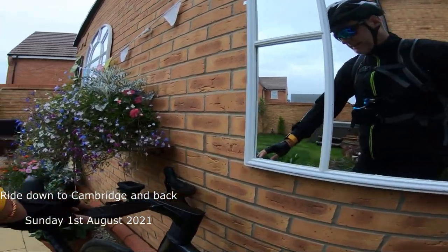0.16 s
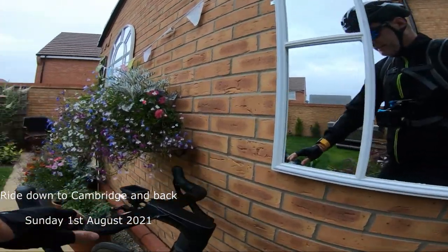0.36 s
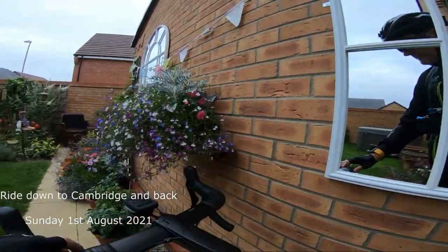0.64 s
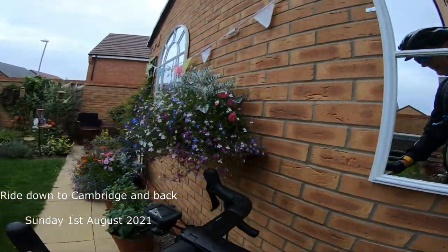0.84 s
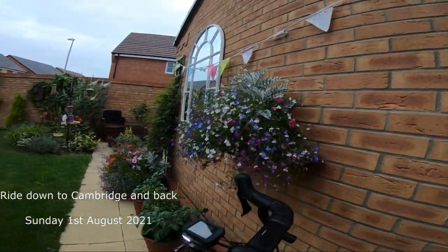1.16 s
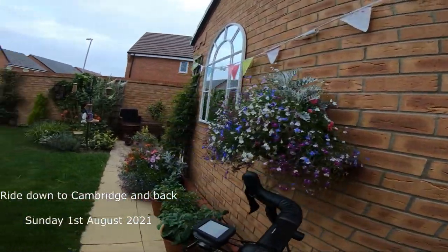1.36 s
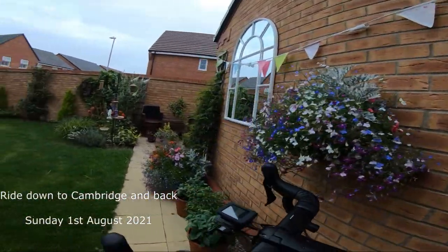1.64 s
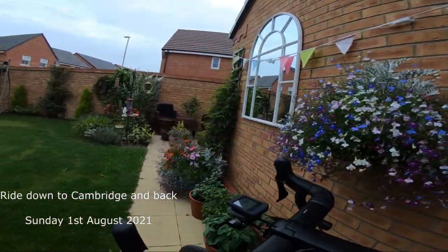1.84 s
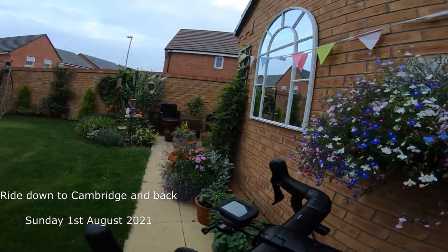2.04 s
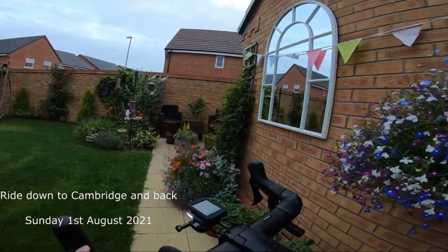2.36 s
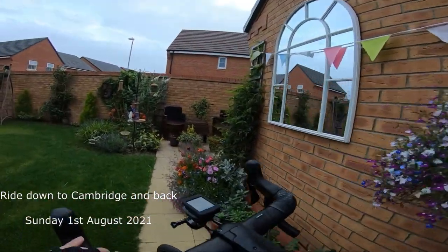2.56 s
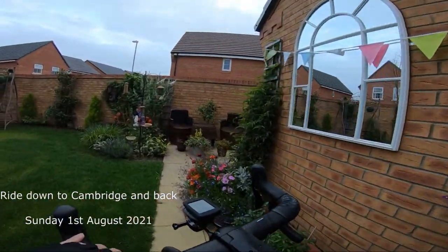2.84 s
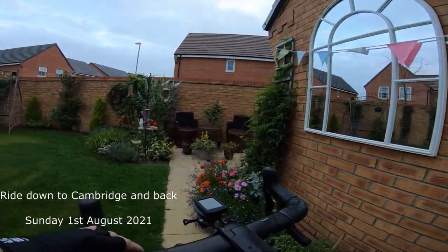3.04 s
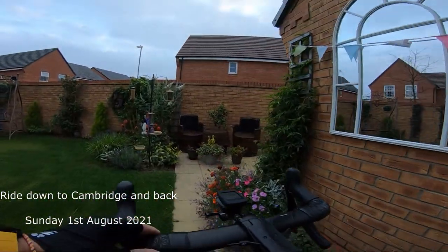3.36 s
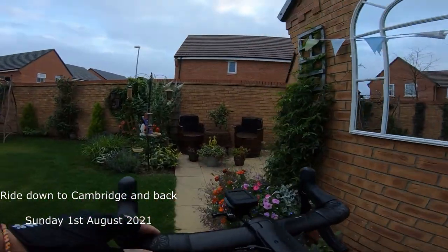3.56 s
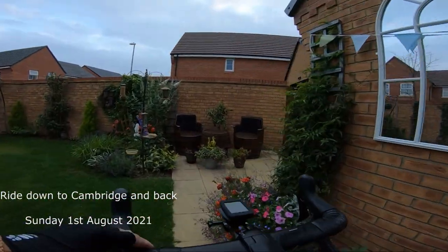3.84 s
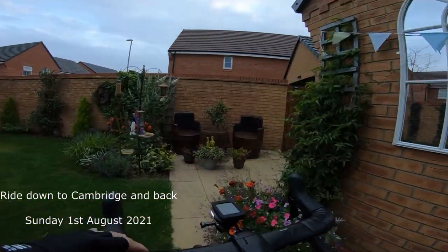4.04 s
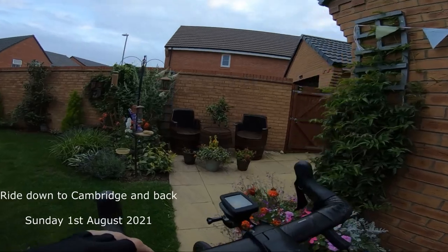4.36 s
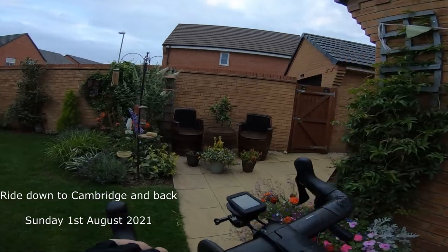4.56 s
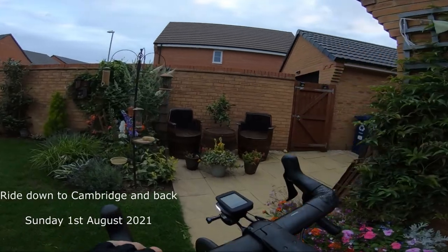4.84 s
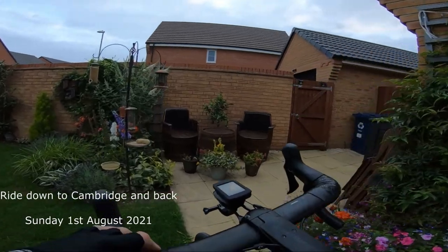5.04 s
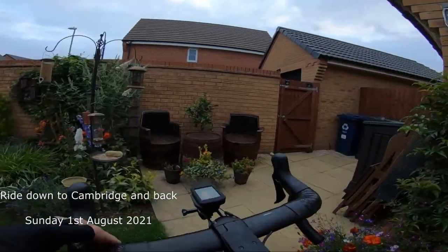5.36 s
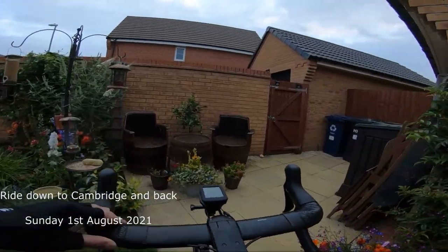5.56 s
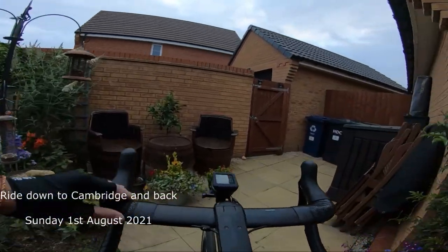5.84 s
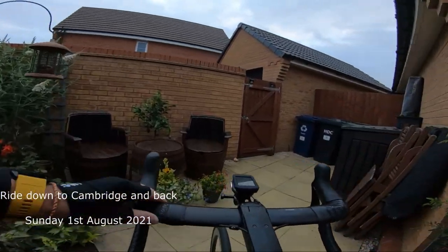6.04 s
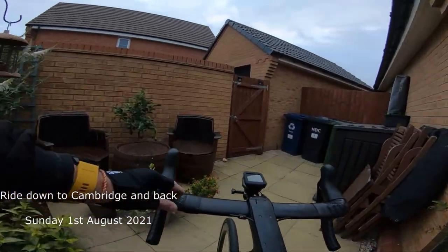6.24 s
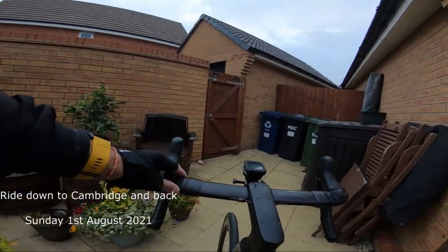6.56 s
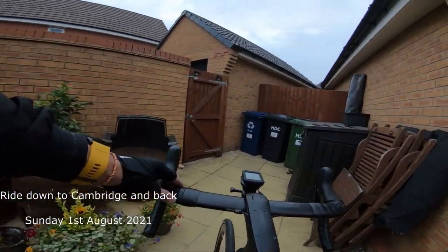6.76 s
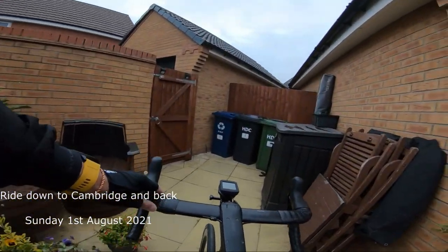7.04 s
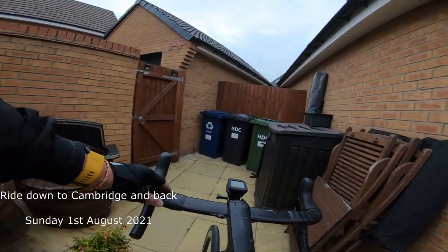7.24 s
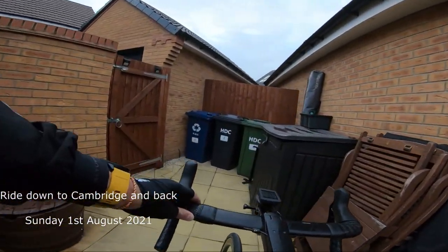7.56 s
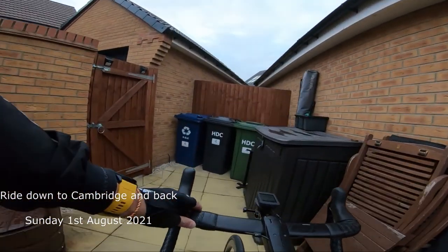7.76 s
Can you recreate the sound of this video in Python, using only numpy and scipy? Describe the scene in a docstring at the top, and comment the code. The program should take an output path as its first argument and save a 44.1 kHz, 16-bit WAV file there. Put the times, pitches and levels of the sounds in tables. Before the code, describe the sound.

A bicycle is wheeled by hand over paving in a small brick-walled yard, heard close in stereo. For the first 1.4 s there is only a quiet hiss, faint tyre grit, dull knocks, short scuffs, a small click on the right at 0.6 s and two barely audible brushes around 1 s. From 1.5 s the freehub ticks, bright and metallic with brief spoke ringing, left of centre, about five per second. At 2.6 s a sharp loud click lands on the left, followed at once by a rustling brush to the right. Low, very soft gusts of air come and go. Another click and a cluster of knocks fall around 3.6 s. Ticks quicken to nearly ten per second by 5.2 s, then slow to about six. Scuffs gather from 5.7 s, a hard knock hits at 6.6 s, and smaller knocks follow at 7.4 to 7.6 s. The walls return a short tail.

```python
"""A road bike is wheeled by hand along a paved path between brick walls; the tyres crunch faintly over a quiet hiss.
First come knocks, scuffs and clicks, damped tones and noise bursts, and two faint brushes of fluttering noise.
From 1.5 s the freehub ticks, each tick noise bursts with ringing spoke modes. At 2.6 s a sharp click falls, then
a stronger brush, and from 2.7 s low gusts of air. The ticks quicken until about 5.2 s, then slow;
a hard knock falls at 6.6 s. The walls add a short scattered tail throughout."""
import sys
import numpy as np
from scipy import signal
from scipy.fft import rfft, irfft, next_fast_len
from scipy.io import wavfile

SR = 44100
rng = np.random.default_rng(int(sys.argv[2]) if len(sys.argv) > 2 else 0)


def output_pcm(signal):
    """Save a mono or channel-first signal as 16-bit PCM at the path in sys.argv[1].

    Samples are clipped to [-1, 1] before scaling.
    """
    pcm = np.clip(np.atleast_2d(signal).T, -1, 1) * 32767
    wavfile.write(sys.argv[1], SR, np.round(pcm).astype(np.int16))


N = 348831

# spectra: (frequency [Hz], relative density [dB])
# arrival at the two ports: (frequency [Hz], likeness [0-1], left re right [dB], phase lead of left [rad])
PORTS_FROM_AROUND = [(40, .2, -3, 0), (140, .93, -1, 0), (350, .92, -1, 0), (750, .5, 1.5, .2),
                     (1500, .25, 3.5, -1), (3000, .55, 2.5, -.6), (6500, .2, 2.5, .5), (12000, .2, 3, 0)]
PORTS_FROM_HUB = [(400, .9, 2, 0), (1650, .82, 7.5, -1.5), (2700, .87, 6, -.75), (3900, .88, 6, -.1),
                  (6500, .4, 6, 1.2), (9000, .45, 8.5, 2.7), (14000, .4, 10, 1.5)]

# walking level, sets tyre grit, jolts and snaps: (time [s], level [dB])
WALK_LEVEL = [(0.0, -63), (0.57, -58), (2.53, -59.5), (2.77, -52.5), (3.33, -58.5), (3.7, -59.5),
              (3.99, -63.5), (5.79, -52.5), (5.99, -57), (6.74, -54), (6.98, -61), (7.38, -61),
              (7.53, -57.5), (7.91, -55)]
# quiet high hiss: (time [s], level [dB])
HISS_LEVEL = [(0.0, -66), (0.51, -62.5), (1.39, -63), (1.63, -53.5), (2.42, -72), (2.91, -59.5),
              (3.26, -62), (3.59, -57), (4.08, -62.5), (4.95, -58), (5.07, -55), (5.29, -55.5), (5.7, -61),
              (6.28, -55), (6.85, -60), (7.2, -63.5), (7.58, -59), (7.91, -65.5)]
# handling murmur: (time [s], level [dB])
MURMUR_LEVEL = [(0.0, -75.5), (0.46, -71), (2.69, -70.5), (2.77, -65), (3.21, -72.5), (3.85, -69.5),
                (4.25, -72), (4.58, -62.5), (5.86, -63), (6.43, -67), (6.61, -59), (7.16, -74), (7.62, -65),
                (7.91, -69)]
# balance of grit and hiss: (time [s], left re right [dB])
WALK_BALANCE = [(0, -6.5), (1.3, -7), (1.55, -5.5), (7.9, -3.5)]
# air pushed over the ports by strides: (start [s], length [s], rumble [dB])
GUSTS = [(2.7, .3, -78), (3.4, 0.64, -74), (4.1, 0.74, -69.5), (5.147, .3, -66), (5.847, .42, -63),
         (6.598, 0.43, -68), (7.25, .42, -61)]
# walking spectra: (frequency [Hz], relative density [dB])
GRIT_SPECTRUM = [(150, -39), (300, -5.5), (480, -9.5), (650, -6.5), (860, -2.5), (1400, -1.5), (1780, -0.5),
                 (2200, -1.5), (3200, -5), (5500, -28), (9000, -50)]
HISS_SPECTRUM = [(2060, -35), (3500, 2), (4080, 1), (5390, 0), (6490, 2), (9620, 2), (10100, -8),
                 (11300, -17.5), (13300, -20), (14400, -22), (16000, -54)]
MURMUR_SPECTRUM = [(50, -44), (110, -61), (135, -5.5), (158, 7), (190, -2), (245, 0.5), (300, -4),
                   (390, -13.5), (480, -16), (800, -42), (2000, -70)]
RUMBLE_SPECTRUM = [(15, -28), (32, -10), (46, -11.5), (62, -24), (100, -32), (160, -35), (500, -80)]
GRIT_DB, MURMUR_DB, HISS_DB = -2.5, 1.5, -1   # re the level tables
GUST_POWER, STILL_AIR_DB = 1.5, -83.5   # arch exponent; rumble between gusts

# sleeve and leaves brushing past: (start [s], length [s], rub [dB], swish [dB])
BRUSHES = [(.82, 0.098, -69, -55.5), (1.058, .15, -60.5, -70), (2.672, 0.29, -41, -45.5)]
# brush spectra: (frequency [Hz], relative density [dB])
RUB_SPECTRUM = [(35, -40), (70, -25), (150, -11), (230, -1.5), (370, -2), (560, -4), (780, -13), (1000, -8),
                (1500, -28), (3000, -55)]
SWISH_SPECTRUM = [(710, -37), (1200, -7), (1600, -3), (2240, 3), (3070, -3.5), (4360, -4.5), (4890, -7),
                  (9420, -8), (15000, -39)]
BRUSH_POWER = 1.64   # arch exponent

# shoe and tyre scuffs: (time [s], level [dB], centre [Hz], t60 [s])
SCUFFS = [(0.15, -48, 1600, 0.026), (.427, -51.5, 1500, 0.1), (.673, -50.5, 1800, 0.025),
          (0.835, -67, 2000, 1), (1.21, -43, 1460, 0.03), (3.068, -47, 1980, .058),
          (3.61, -48.5, 1520, 0.18), (3.828, -43, 1510, 0.027), (4.679, -49.5, 1185, .058),
          (4.929, -48.5, 1300, 0.086), (5.659, -47, 1630, 0.27), (5.745, -44, 1470, .25),
          (5.831, -40.5, 1660, 0.023), (5.879, -43.5, 1600, 0.061), (6.199, -39, 1480, 0.042),
          (6.574, -38.5, 2150, 0.26), (6.607, -37.5, 3160, 0.1), (7.493, -42, 1090, 0.055)]
# loose grit; dB re the walking level
SNAPS_PER_S, SNAP_DB, SNAP_RANGE_HZ, SNAP_T60_S = 4, 6, (1000, 2000), 0.026
SMALL_SPREAD_DB = 3.5   # jolts and snaps vary by plus or minus this

# levers and fittings: (time [s], level [dB], pitch [Hz], t60 [s], left re right [dB], rattle re contact [dB])
CLICKS = [(0.5731, -29.5, 1700, 0.0029, -20, -28), (.937, -46, 2190, 0.0022, -5, -3.5),
          (1.069, -52, 1350, 0.0043, -1, 2.5), (2.627, -14, 1580, 0.0041, 7.5, -19),
          (3.5727, -31, 1770, 0.0031, 6, -6), (3.573, -21.5, 4200, 0.0057, 3, -31),
          (6.137, -38, 1300, 0.0073, -22, -25), (6.16, -39.5, 1110, 0.0038, -17, -14)]

# bike knocks and footfalls: (time [s], level [dB], pitch [Hz], left re right [dB])
KNOCKS = [(.151, -38.5, 750, 9), (.574, -38.5, 380, -4), (.78, -43, 172, 2), (.887, -40.5, 437, 4),
          (1.104, -38.5, 810, 9), (1.212, -38.5, 760, 9), (1.96, -29, 495, 3), (2, -38, 307, -5),
          (2.202, -31.5, 700, 13), (2.629, -29.5, 664, 0), (3.573, -30, 694, 6), (3.592, -25.5, 275, 0),
          (3.607, -38, 170, 3), (3.7119, -28, 810, 12), (3.72, -34, 268, -3), (4.583, -33.5, 590, -6),
          (4.596, -36, 613, -5), (6.59, -32.5, 330, 2), (6.5987, -19, 543, 2), (6.599, -22.5, 258, -1),
          (7.379, -28.5, 204, 0.5), (7.496, -35, 497, -5), (7.563, -27, 710, 7), (7.57, -27, 730, -3)]
# frame shudder: (frequency [Hz], relative density [dB])
FRAME_SPECTRUM = [(50, -29), (115, -37), (160, 15), (200, 7.5), (245, 4), (310, -6), (388, 4), (470, 1.5),
                  (559, -8), (660, -3.5), (1100, -4), (1800, -6.5), (5000, -22.5), (12000, -58)]
KNOCK_T60_CYCLES = 7.8
# re a knock at SHUDDER_REF_HZ; lighter, higher knocks shake the frame less
SHUDDER_DB, SHUDDER_REF_HZ, SHUDDER_DB_PER_OCTAVE = -16.5, 397, -3
TUBE_HZ, TUBE_T60_S, TUBE_DB = 164, 0.23, -6.5   # lowest frame mode; dB re the shudder
# uneven slabs; dB re the walking level
JOLTS_PER_S, JOLT_DB, JOLT_RANGE_HZ = 2.1, 5, (201, 625)

# pawl drops: (time [s], level [dB], strongest ring [Hz], ring re level [dB])
TICKS = [(1.4616, -28.5, 2560, -7.5), (1.6586, -29.5, 3600, 4.5), (1.854, -30, 3030, 6.5),
         (2.0267, -30, 4014, -4), (2.1813, -30, 3470, 0), (2.3277, -28, 4050, -1.5),
         (2.473, -30.5, 2600, -1), (2.613, -30, 2760, -12), (2.744, -31, 3950, 0),
         (2.8756, -30.0, 4050, -6.5), (3.0068, -32, 3460, -11), (3.1421, -30, 2790, 1),
         (3.2896, -31, 3490, 2.5), (3.4451, -31.5, 2530, 4), (3.5911, -30, 2773, 1),
         (3.724, -30.5, 3920, -2), (3.864, -32, 3120, -2), (4.0145, -30.5, 2820, -1.5),
         (4.158, -31, 3760, -2), (4.2852, -30.0, 2743, 0.5), (4.4017, -29, 2775, -0.5),
         (4.5113, -29, 2770, -3), (4.6246, -30, 3220, -0.5), (4.7436, -32.0, 2623, 3.5),
         (4.8589, -31, 2400, -2.5), (4.97, -31.5, 2627, 5), (5.0741, -29.5, 2615, -4),
         (5.178, -29.5, 2860, -3.5), (5.2812, -29, 2776, 2.5), (5.3861, -30, 2870, -5),
         (5.501, -30, 2310, -4), (5.612, -30, 4090, -8), (5.7309, -30.5, 2550, -6),
         (5.8522, -29.5, 3490, -2), (5.9699, -28, 4020, -8), (6.0926, -31, 2860, -1),
         (6.2237, -27.5, 2720, 1), (6.3612, -29.5, 2335, 2), (6.4987, -29.5, 2710, -1),
         (6.6499, -28, 2790, -3), (6.8059, -29, 2600, -11), (6.9657, -30.5, 3630, -6),
         (7.1369, -29.5, 3970, 0), (7.3074, -28, 3485, -3), (7.4712, -28.5, 2950, -4),
         (7.6399, -30, 3640, 3.5), (7.7883, -29, 3056, -4)]
# hub regions: (level re tick [dB], t60 [s], spectrum as (frequency [Hz], relative density [dB]))
HUB_REGIONS = [(-11.5, 0.037, [(250, -84), (700, -11.5), (1200, -6.5), (1650, 4), (2100, 3), (2600, -10.5),
               (4000, -73)]), (-6.5, 0.034, [(1200, -19), (1900, -25.5), (2300, -3), (2650, 5), (3100, 0),
               (3600, -19), (6000, -76)]), (-8, 0.05, [(2000, -64), (3000, -24), (3450, 2), (4050, -2.5),
               (4450, 0.5), (5150, -7), (5900, -14.5), (8000, -38)]), (-8, 0.049, [(4000, -58), (6000, -13),
               (7000, -9), (8300, 0), (9700, 3.5), (10300, -6.5), (11200, -23.5), (14500, -21),
               (16500, -53)])]
# modes of spokes and brake disc: (frequency [Hz], level [dB], t60 [s])
WHEEL_MODES = [(1045, -21, 0.44), (1624, -1, .12), (1710, -8, 0.41), (1980, -22, .15), (2245, -6, .2),
               (2300, -10, 0.41), (2656, -6.5, 0.2), (2720, -5.5, 0.26), (2770, -16, 0.12),
               (3060, -9.5, 0.4), (3310, -12, 0.16), (3438, -4.5, 0.22), (3670, -9, 0.11),
               (3870, -15, 0.096), (3996, 6, 0.09), (4070, -10, 0.24), (4500, -28, 0.1), (5660, -19, 0.17)]
# blur of all the other spokes: (frequency [Hz], relative density [dB])
SPOKE_SPECTRUM = [(600, -36), (1300, -21), (1750, -8.5), (2700, -4.5), (4050, -6.5), (4500, -17),
                  (5200, -14), (6200, -16), (9000, -39)]
# treble of ticks and modes as the body shades the hub: (time [s], level [dB])
FACING_LEVEL = [(1.4, 0), (2.5, 3), (3.1, 0.5), (4.8, -2), (5.6, 0), (7.9, -1)]
SHADE_HZ = 4600   # shading acts above this
TICK_SWELL_S = 0.0049   # a pawl drop spreads through the wheel
RING_T60_S = 0.049   # strongest ring, in the hub
LINGER_DB, LINGER_T60_S = -17, 0.24   # its remainder in the spokes; dB re the ring
REGION_SPREAD_DB = 1.5   # random level spread of each hub region from tick to tick
TICK_HIGHPASS_HZ = 670

YARD_T60_S, SWELL_POWER = 0.5, 0.25   # SWELL_POWER shapes every burst onset
CUTOFF_HZ = 16400


def from_db(db):
    """Decibels to gain."""
    return 10 ** (np.asarray(db) / 20)


def rms_one(x):
    """Scale to rms 1."""
    return x / np.sqrt(np.mean(x ** 2) + 1e-20)


def in_time(rows):
    """Gain curve of a (time [s], level [dB]) table."""
    s, db = np.transpose(rows)
    return from_db(np.interp(np.arange(N) / SR, s, db))


def at_hz(rows, hz):
    """Table columns interpolated on a log-frequency axis."""
    f, *columns = np.transpose(rows)
    return [np.interp(np.log(hz + 1e-3), np.log(f), c) for c in columns]


def panned(db):
    """Left and right gains for a left-re-right level in dB."""
    return from_db(np.array([[db], [-db]]) / 2)


def add(out, s, sound):
    """Mix a sound in at s seconds."""
    i = max(round(s * SR), 0)
    out[:, i:i + sound.shape[1]] += sound[:, :N - i]


def noise(spectrum, ports, size=N):
    """Coloured stereo noise with the ports' coherence, balance and phase; the mid has rms 1."""
    n = next_fast_len(size)
    hz = np.arange(n // 2 + 1) * SR / n
    alike, side_db, phase = at_hz(ports, hz)
    alike = np.clip(alike, 0, 1)
    gain = from_db(at_hz(spectrum, hz)[0])
    left, own = rfft(rng.standard_normal((2, n))) * gain
    right = (alike * left + np.sqrt(1 - alike ** 2) * own) * np.exp(-1j * phase)
    balanced = np.array([left * from_db(side_db / 2), right * from_db(-side_db / 2)])
    pair = irfft(balanced, n)[:, :size]
    return pair / pair.mean(axis=0).std()


def hump(hz, slope_db):
    """Spectrum with a rounded peak at hz, approaching slope_db per octave on both sides."""
    return [(hz * 2. ** k, -slope_db * (np.hypot(k, .5) - .5)) for k in range(-6, 6)]


def dying(t, t60):
    """Exponential decay, 60 dB in t60 seconds."""
    return from_db(-60 * t / t60)


def ring(t, hz, t60, phase=0):
    """One damped mode."""
    return np.sin(2 * np.pi * hz * t + phase) * dying(t, t60)


def burst(t, swell_s, t60, hold_s=0):
    """Envelope that swells, holds, then decays."""
    swell = np.minimum(t / swell_s, 1) ** SWELL_POWER
    return swell * dying(np.maximum(t - swell_s - hold_s, 0), t60)


def arch(start, length, power):
    """Smooth rise and fall between zero and one."""
    progress = np.clip((np.arange(N) / SR - start) / length, 0, 1)
    return np.sin(np.pi * progress) ** power


def grains(per_s, spread_db, grain_s, size=N):
    """Envelope of many small contacts at random; rms 1."""
    strength = from_db(spread_db * np.minimum(rng.exponential(1, size), 4))
    hits = strength * (rng.random(size) < per_s / SR)
    energy = signal.lfilter([1], [1, -np.exp(-1 / (grain_s * SR))], hits ** 2 + 1e-12)
    return rms_one(np.sqrt(energy))


def underfoot(per_s, db, range_hz):
    """Small events at random times, scaled by the walking level: rows (time [s], level [dB], pitch [Hz])."""
    count = max(round(per_s * N / SR), 1)
    when, strength, pitch = rng.random((count, 3)).T
    s = when * N / SR
    low, high = range_hz
    level = np.interp(s, *np.transpose(WALK_LEVEL)) + db + SMALL_SPREAD_DB * (2 * strength - 1)
    return list(zip(s, level, low * (high / low) ** pitch))


def yard(x):
    """Brick walls and paving return a short, scattered tail: convolution with decaying noise."""
    t = np.arange(SR // 2) / SR
    # (frequency [Hz], relative density [dB])
    walls = [(100, 9.0), (1000, 10.0), (3500, -3.5), (6000, 1.5), (10000, -1.5), (16000, -4.0)]
    tail = noise(walls, PORTS_FROM_AROUND, size=len(t)) * burst(t, swell_s=0.0027, t60=YARD_T60_S)
    tail /= np.sqrt(np.sum(tail ** 2) / 2)
    return signal.fftconvolve(x.mean(axis=0)[None], tail, axes=1)[:, :N]


def walking():
    """Tyre grit, quiet high hiss, handling murmur and air rumble as level-driven coloured noise."""
    grit = in_time(WALK_LEVEL) * noise(GRIT_SPECTRUM, PORTS_FROM_AROUND)
    grit *= grains(per_s=1200, spread_db=2.5, grain_s=0.0024)
    hiss = in_time(HISS_LEVEL) * noise(HISS_SPECTRUM, PORTS_FROM_AROUND)
    left_over_right = in_time(WALK_BALANCE)
    out = from_db(GRIT_DB) * grit + from_db(HISS_DB) * hiss
    out *= np.sqrt([left_over_right, 1 / left_over_right])
    murmur = in_time(MURMUR_LEVEL) * noise(MURMUR_SPECTRUM, PORTS_FROM_AROUND)
    murmur *= grains(per_s=140, spread_db=2.8, grain_s=0.018)
    air = from_db(STILL_AIR_DB) + sum(from_db(db) * arch(s, length, GUST_POWER) for s, length, db in GUSTS)
    return out + from_db(MURMUR_DB) * murmur + air * noise(RUMBLE_SPECTRUM, PORTS_FROM_AROUND)


def brush():
    """Fluttering rub with a coarse swish above it, weighted to the right."""
    rub_level, swish_level = np.zeros((2, N))
    for s, length, rub_db, swish_db in BRUSHES:
        stroke = arch(s, length, BRUSH_POWER)
        rub_level += from_db(rub_db) * stroke
        swish_level += from_db(swish_db) * stroke
    rub = rub_level * noise(RUB_SPECTRUM, PORTS_FROM_AROUND)
    rub *= grains(per_s=590, spread_db=1.2, grain_s=0.0046)
    swish = swish_level * noise(SWISH_SPECTRUM, PORTS_FROM_AROUND)
    swish *= grains(per_s=800, spread_db=1.0, grain_s=0.0038)
    return rub * panned(-2.5) + swish * panned(-9)


def scuffs():
    """Soles drag over gritty slabs and loose grains snap: grainy noise bursts."""
    out, t = np.zeros((2, N)), np.arange(SR // 3) / SR
    snaps = [(s, db, hz, SNAP_T60_S) for s, db, hz in underfoot(SNAPS_PER_S, SNAP_DB, SNAP_RANGE_HZ)]
    for s, db, hz, t60 in SCUFFS + snaps:
        scrape = noise(hump(hz, slope_db=8.0), PORTS_FROM_AROUND, size=len(t))
        add(out, s, from_db(db) * scrape * burst(t, swell_s=0.0024, t60=t60))
    crunch = out * grains(per_s=1400, spread_db=-1.5, grain_s=0.0042)
    # scuffs and snaps are softened above 5.2 kHz
    return signal.sosfilt(signal.butter(2, 5200, fs=SR, output="sos"), crunch)


def clicks():
    """Hard contact of a few cycles with a brief noise rattle behind it."""
    out, t = np.zeros((2, N)), np.arange(SR // 5) / SR
    for s, db, hz, t60, side_db, rattle_db in CLICKS:
        rattle = noise(hump(hz, slope_db=12), PORTS_FROM_AROUND, size=len(t))
        rattle *= burst(t, swell_s=0.0036, t60=0.044)
        contact = ring(t, hz, t60) * np.minimum(t * hz, 1)
        contact /= abs(contact).max()
        add(out, s, from_db(db) * panned(side_db) * (contact + from_db(rattle_db) * rattle))
    return out


def knocks():
    """Small noise crack and damped thud, with a short shudder of the frame."""
    out, t = np.zeros((2, N)), np.arange(SR // 3) / SR
    jolts = [(s, db, hz, 0) for s, db, hz in underfoot(JOLTS_PER_S, JOLT_DB, JOLT_RANGE_HZ)]
    for s, db, hz, side_db in KNOCKS + jolts:
        crack = noise(hump(1400, slope_db=17.0), PORTS_FROM_AROUND, size=len(t)) * dying(t, t60=0.0075)
        shudder = noise(FRAME_SPECTRUM, PORTS_FROM_AROUND, size=len(t)) * burst(t, swell_s=0.0015, t60=0.11)
        tube = ring(t, TUBE_HZ, TUBE_T60_S, rng.uniform(0, 2 * np.pi)) * (1 - np.exp(-t * TUBE_HZ))
        shudder += from_db(TUBE_DB) * tube
        shudder_db = SHUDDER_DB + SHUDDER_DB_PER_OCTAVE * np.log2(hz / SHUDDER_REF_HZ)
        motion = ring(t, hz, KNOCK_T60_CYCLES / hz) * (1 - np.exp(-t * hz * 4))
        # pressure follows the rate of motion
        thud = np.gradient(motion) * SR / (2 * np.pi * hz)
        knock = thud + from_db(-28) * crack + from_db(shudder_db) * shudder
        add(out, s, from_db(db) * panned(side_db) * knock)
    # little deep bass
    return signal.sosfilt(signal.butter(3, 108, "high", fs=SR, output="sos"), out)


def shaded(x):
    """Treble level follows the hub moving in and out behind the body."""
    low = signal.sosfilt(signal.butter(1, SHADE_HZ, fs=SR, output="sos"), x)
    return low + in_time(FACING_LEVEL) * (x - low)


def wheel_mode(t, hz, t60):
    """Damped wheel mode with the hub's balance and phase at the two ports."""
    _, side_db, lead = at_hz(PORTS_FROM_HUB, hz)
    phase = rng.uniform(0, 2 * np.pi) + np.array([[lead], [0]])
    return panned(side_db) * ring(t, hz, t60, phase)


def freehub():
    """Each pawl drop spreads through hub and rim in a few ms; wheel modes ring on, varying per tick."""
    out, t = np.zeros((2, N)), np.arange(SR // 2) / SR
    early = t[:SR // 5]
    for s, db, ring_hz, ring_db in TICKS:
        start = s - .0005   # each burst starts half a millisecond before its listed time
        # pawls land unevenly and bounce
        bounces = grains(per_s=1500, spread_db=0.04, grain_s=0.001, size=len(early))
        for region_db, t60, spectrum in HUB_REGIONS:
            envelope = burst(early, TICK_SWELL_S, t60, hold_s=0.00029) * bounces
            body = noise(spectrum, PORTS_FROM_HUB, size=len(early)) * envelope
            add(out, start, from_db(db + region_db + REGION_SPREAD_DB * rng.normal()) * body)
        blur = noise(SPOKE_SPECTRUM, PORTS_FROM_HUB, size=len(early)) * burst(early, swell_s=0.013, t60=0.15)
        add(out, start, from_db(db - 16.0) * blur)
        tones = np.zeros((2, len(t)))
        for hz, mode_db, t60 in WHEEL_MODES:
            gain = from_db(mode_db + 2.84 * rng.normal())
            detuned_hz = hz * (1 + 0.0023 * rng.normal())   # no two spokes are quite in tune
            tones += gain * wheel_mode(t, detuned_hz, t60)
        strongest = wheel_mode(t, ring_hz, RING_T60_S)
        strongest += from_db(LINGER_DB) * wheel_mode(t, ring_hz, LINGER_T60_S)
        wheel = from_db(ring_db) * strongest + from_db(-17.0) * tones
        add(out, start, from_db(db) * wheel * np.minimum(t / TICK_SWELL_S, 1))
    return signal.sosfilt(signal.butter(2, TICK_HIGHPASS_HZ, "high", fs=SR, output="sos"), out)


def scene():
    """Wheel and feet fill the walled yard; knocks and clicks are close and nearly dry."""
    ground = shaded(freehub()) + scuffs()
    close = knocks() + clicks()
    echo = from_db(-9) * yard(ground + from_db(-10.0) * close)
    return ground + close + echo + brush() + walking()


def record(dry):
    """Steep elliptic low-pass."""
    return signal.sosfilt(signal.ellip(10, .1, 80, CUTOFF_HZ, fs=SR, output="sos"), dry)


dry = scene()
out = record(dry)
output_pcm(out)
```